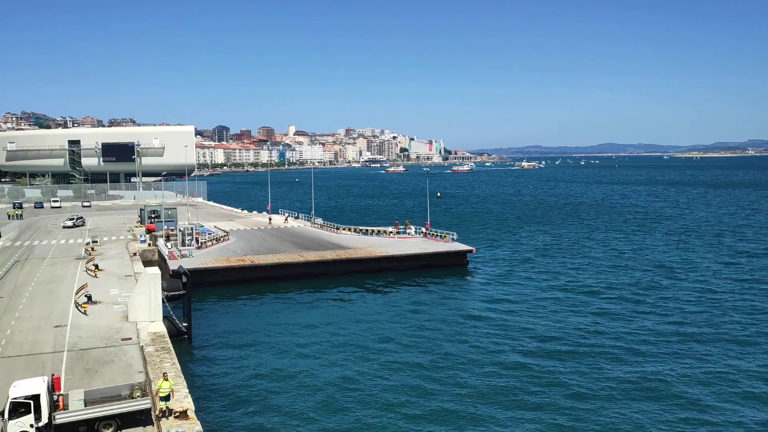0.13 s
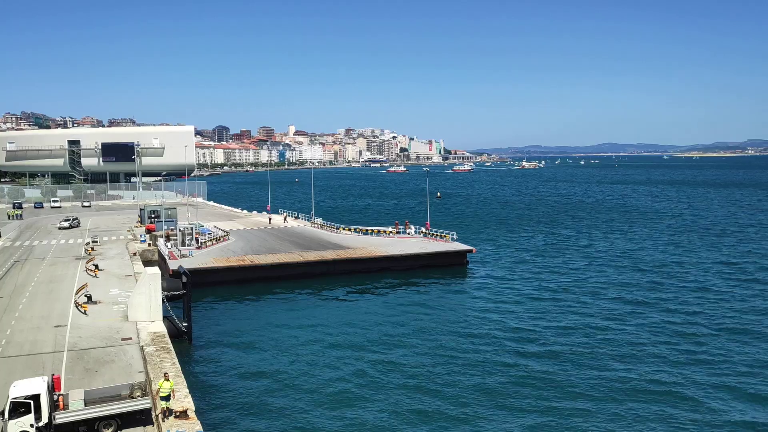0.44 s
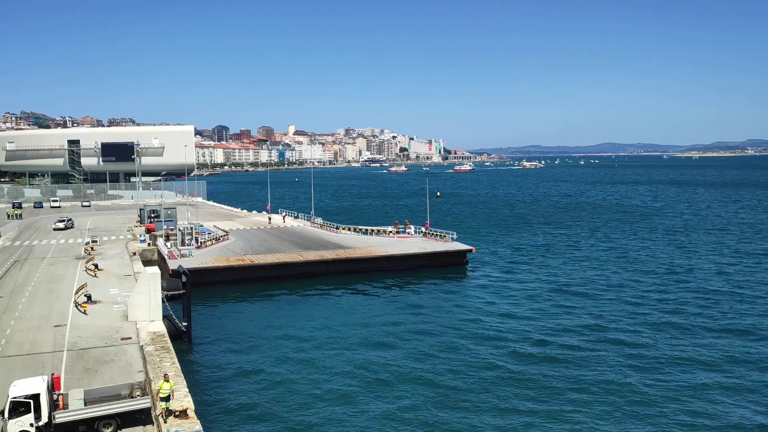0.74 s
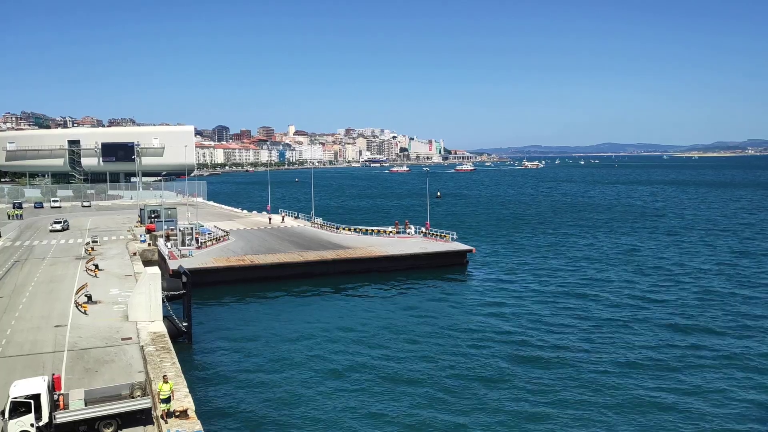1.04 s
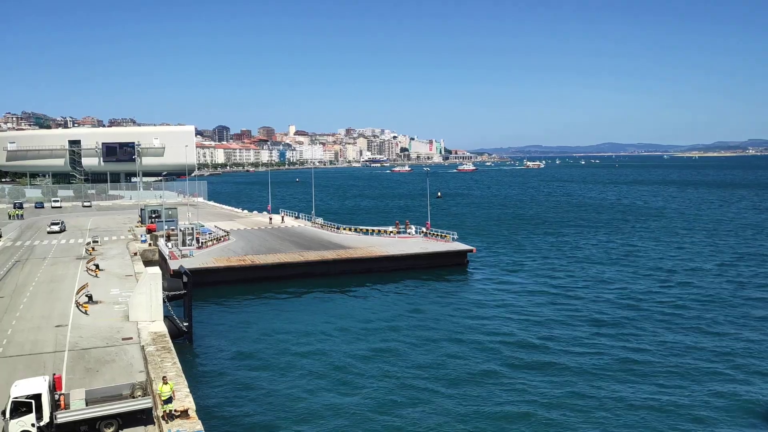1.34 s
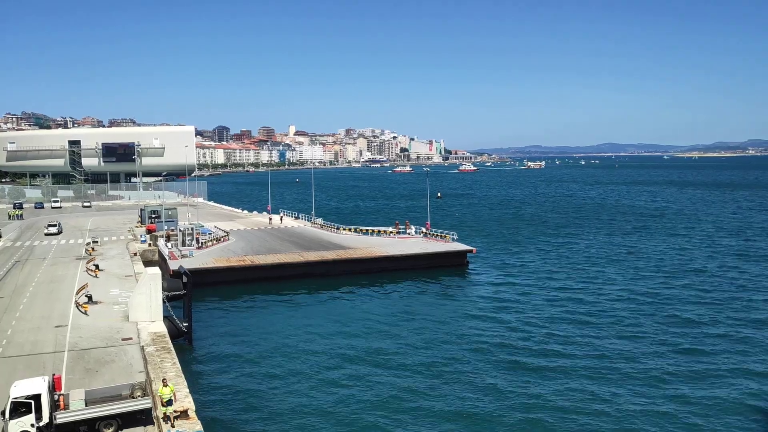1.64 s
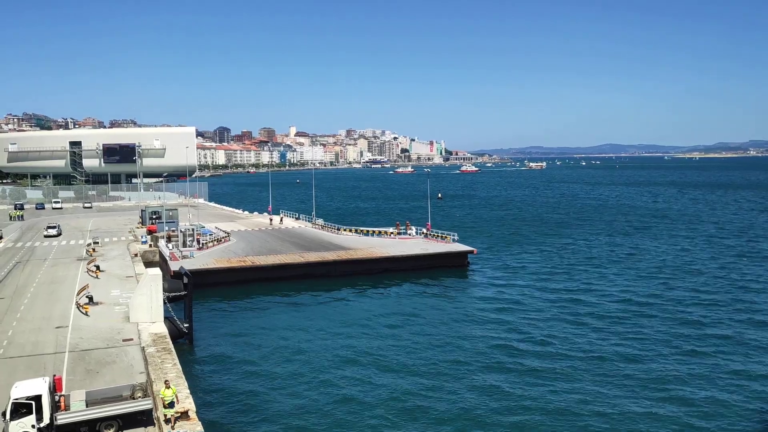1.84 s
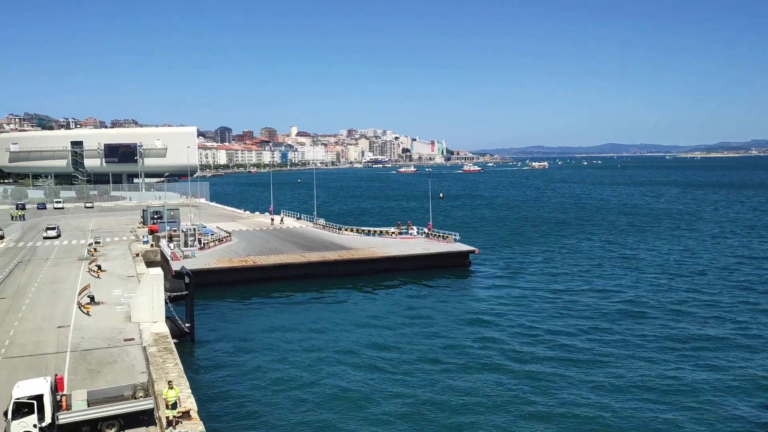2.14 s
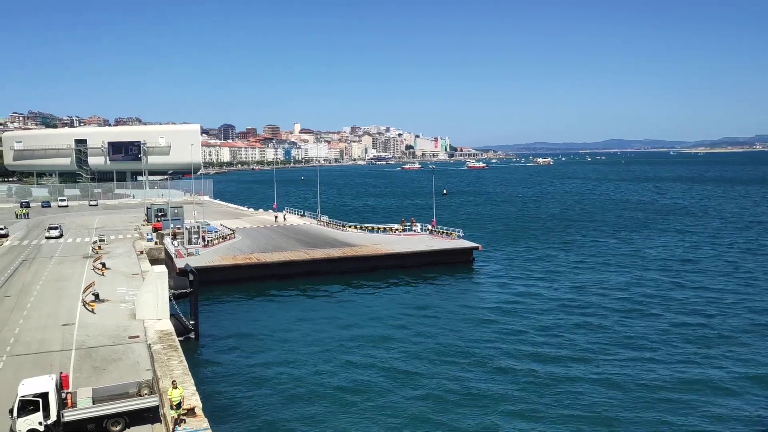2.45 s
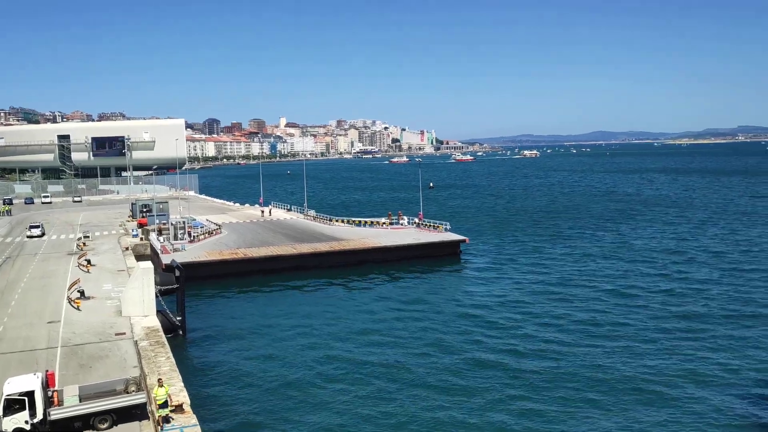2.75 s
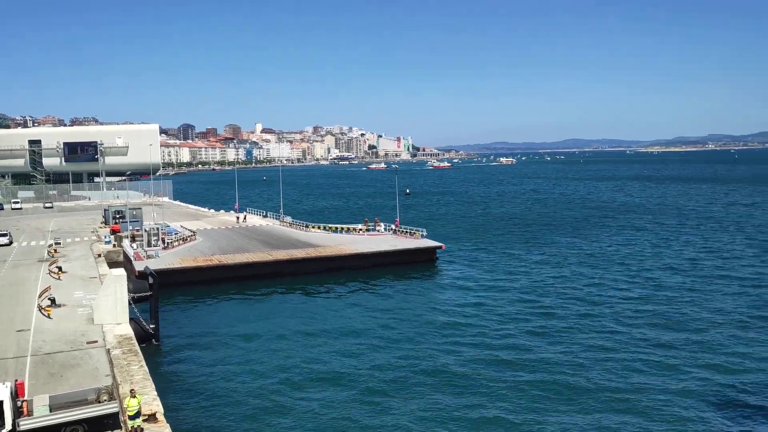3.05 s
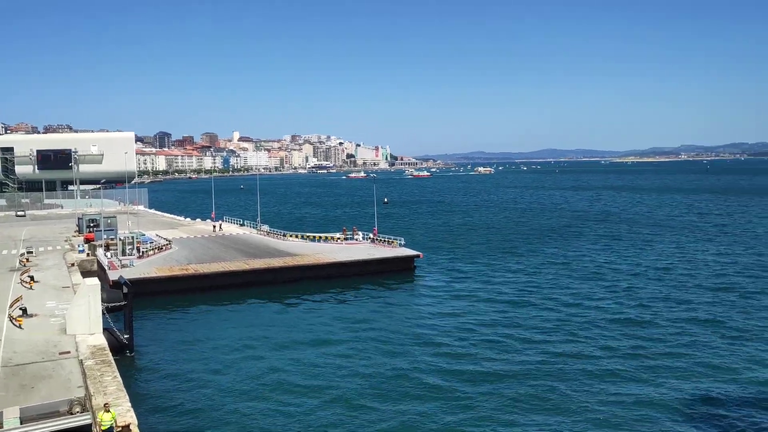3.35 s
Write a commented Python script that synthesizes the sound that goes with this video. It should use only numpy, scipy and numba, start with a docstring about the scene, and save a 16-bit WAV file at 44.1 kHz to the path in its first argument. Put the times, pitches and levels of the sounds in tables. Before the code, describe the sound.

A ship's engine whine holds one steady pitch over a dull roar of engine and fans, with faint water hiss. On an open deck above a harbour, wind thumps the unprotected stereo microphone, mostly on the right.

```python
"""On the open deck of a docking ship: a steady machine whine, a stack of phase-locked sines, over the roar of
engine and fans and the hiss of churned water, both shaped stereo noise. Wind buffets the two microphone ports
separately (noise below the roar) and pops sharply (short damped swings), mostly on the right; each channel's
limiter ducks after the big pops. The recorder fades in."""
import sys
import numpy as np
from scipy import signal
from scipy.fft import rfft, irfft, next_fast_len
from scipy.io import wavfile
from scipy.ndimage import uniform_filter1d, minimum_filter1d, map_coordinates
from numba import njit

SR = 44100
rng = np.random.default_rng(int(sys.argv[2]) if len(sys.argv) > 2 else 0)


def gain_from_db(level_db):
    """Convert decibel levels to linear amplitude factors (20 dB per decade)."""
    decades = np.asarray(level_db, float) / 20
    return 10 ** decades


def transcribe(signal):
    """Save signal, clipped to [-1, 1], as a 16-bit WAV file at the path in sys.argv[1]."""
    frames = np.atleast_2d(signal).T
    limited = np.clip(frames, -1, 1)
    pcm = np.round(limited * 32767).astype(np.int16)
    wavfile.write(sys.argv[1], SR, pcm)


N = 153909


def unit(x):
    """Scale to rms 1."""
    return x / np.sqrt(np.mean(x ** 2) + 1e-20)


def along(points, hz):
    """Interpolate (frequency [Hz], value) points on a log frequency axis."""
    f, v = np.transpose(points)
    return np.interp(np.log(hz + 1), np.log(f + 1), v)


def curves(rows):
    """One value per sample for each column after the time."""
    s, *cols = np.transpose(rows)
    return [np.interp(np.arange(N) / SR, s, c) for c in cols]


def wobble(knots_per_s):
    """Smooth random curve: a spline through normal random knots."""
    knots = rng.standard_normal(200)
    return map_coordinates(knots, [np.arange(N) * knots_per_s / SR], mode="mirror")


def filtered(x, response):
    """Multiply the spectrum of x by a function of frequency [Hz]."""
    m = next_fast_len(N + SR // 2)
    return irfft(rfft(x, m) * response(np.fft.rfftfreq(m, 1 / SR)), m)[..., :N]


def rush(left, right, alike, patchy_db):
    """Turbulent stereo noise, rms 1: random gain patches in time-frequency, then a spectrum per side."""
    z = signal.stft(rng.standard_normal((2, N)), nperseg=512)[2]
    field = uniform_filter1d(rng.standard_normal(z.shape), size=6, axis=1)
    field = uniform_filter1d(field, size=10, axis=2)
    pair = signal.istft(z * gain_from_db(patchy_db * unit(field)), nperseg=512)[1][:, :N]

    def mid_side_gain(hz):
        turn_rad = np.arccos(np.clip(along(alike, hz), -1, 1)) / 2
        return np.array([np.cos(turn_rad), np.sin(turn_rad)])

    mid, side = filtered(pair, mid_side_gain)
    ports = np.array([mid + side, mid - side])
    return unit(filtered(ports, lambda hz: gain_from_db([along(left, hz), along(right, hz)])))


WHINE_HZ, WAVER_RAD = 273.83, 0.043
FADING_DB, FADING_PER_OCTAVE_DB = 0.5, 0.67
# Strong overtones, before fading:
# (overtone, mid-time level [dB rms], left-right [dB], left lead [rad], swell [dB/s])
OVERTONES = [(1, -33, 1.5, 0.16, 0.3), (2, -27, 1.5, 1.05, 0.2), (3, -44, 4, 1.3, 0),
             (4, -43, -4.5, 1.61, -0.8), (5, -47, -3, 1.03, 0.5), (6, -43.5, 1, 1.94, 2.2),
             (7, -52.5, -7, .1, 0.6), (8, -55, -2, 1.2, 1.5), (9, -51, -0.5, 2.18, 1),
             (10, -55, 1, 1.9, 2.5), (11, -71, .1, 1.5, 3), (12, -74, .1, 1.7, .1), (13, -70, -2, 1.8, -4),
             (14, -67, 7, 1.5, 1.5)]
# Weak overtones 15 to 46, before scatter and fading: (frequency [Hz], level [dB rms], left-right [dB])
WEAK_OVERTONES = [(4000, -74, .5), (6500, -78, -5), (8000, -76, 3), (9500, -74, 6), (11500, -78, 14),
                  (13000, -84, 16)]
WEAK_SCATTER_DB = 2


def whine():
    """Locked overtones; each reaches the two ports with its own level, lead and slow fading."""
    waver = WAVER_RAD * (wobble(3.04) + wobble(9.27) / 2)
    phase = 2 * np.pi * WHINE_HZ * np.arange(N) / SR + waver
    hz, weak_db, weak_pan_db = np.transpose(WEAK_OVERTONES)
    weak = []
    for k in range(15, 47):
        db = np.interp(k * WHINE_HZ, hz, weak_db) + WEAK_SCATTER_DB * rng.standard_normal()
        weak.append((k, db, np.interp(k * WHINE_HZ, hz, weak_pan_db), 1.5, 0))
    out = np.zeros((2, N))
    for k, db, pan_db, lead_rad, swell_db_per_s in OVERTONES + weak:
        depth_db = FADING_DB + FADING_PER_OCTAVE_DB * np.log2(k)
        trend_db = swell_db_per_s * (np.arange(N) - N / 2) / SR
        start_rad = rng.uniform(0, 2 * np.pi)
        shared, own = wobble(1.44), wobble(5.17)
        for port, side in enumerate((.5, -.5)):
            own = own[::-1]  # reversed in time: a different course at each port
            fading_db = depth_db * (0.56 * shared + 0.81 * own)
            level = gain_from_db(db + trend_db + side * pan_db + fading_db)
            drift_rad = 0.031 * depth_db * np.roll(own, SR)
            angle = round(k) * phase + start_rad + side * lead_rad + drift_rad
            out[port] += np.sqrt(2) * level * np.sin(angle)
    return out


ROAR_DB = -32.5
# Roar spectrum: (frequency [Hz], relative density [dB per Hz])
ROAR_SPECTRUM = [(60, -69), (150, -2.5), (250, -5), (350, -6.5), (560, -10.5), (660, -12), (950, -13.5),
                 (1200, -14.5), (1500, -17), (1750, -16), (2100, -17), (2300, -18), (2700, -20),
                 (2950, -28), (4500, -47), (9000, -68), (15000, -120)]
# Roar at the two ports: (frequency [Hz], left-right correlation [1])
ROAR_CORRELATION = [(200, 1), (740, 0.98), (1200, -0.04), (3000, -0.1)]


def roar():
    """Broad engine and fan noise with a slight level waver."""
    level = gain_from_db(ROAR_DB + 0.35 * wobble(3.82))
    return level * rush(ROAR_SPECTRUM, ROAR_SPECTRUM, ROAR_CORRELATION, patchy_db=1.24)


WASH_GAIN_DB = 0.5
# Wash level, before WASH_GAIN_DB and waver: (time [s], level [dB])
WASH_LEVEL = [(0.4, -44.5), (0.81, -45), (1.54, -44.5), (1.82, -43.5), (2.74, -42), (2.92, -43),
              (3.49, -41.5)]
# Wash spectrum per port: (frequency [Hz], relative density [dB per Hz])
WASH_LEFT_SPECTRUM = [(800, -32), (2500, -0.5), (3800, 0), (5200, -2.5), (7000, -7), (7800, -2), (8800, -2),
                      (12800, -3), (13800, -6), (14800, -3), (15700, -11)]
WASH_RIGHT_SPECTRUM = [(800, -27), (2500, -4.5), (3800, 3.5), (5400, 2), (6200, 4.5), (7200, 4), (7900, -5),
                       (8400, 0), (9400, -3.5), (10500, -14), (12000, -21), (14900, -27), (15700, -35)]


def wash():
    """Hiss of churned water, uncorrelated and coloured differently at each port."""
    level_db, = curves(WASH_LEVEL)
    level = gain_from_db(WASH_GAIN_DB + level_db + 0.17 * wobble(7.46))
    return level * rush(WASH_LEFT_SPECTRUM, WASH_RIGHT_SPECTRUM, [(1000, 0)], patchy_db=1.04)


# Wind strength, scaling buffets and small eddies: (time [s], strength [dB], left-right [dB])
WIND_STRENGTH = [(0.1, -32, -2), (0.31, -32.5, 3), (0.43, -16, -4.5), (0.51, -22.5, 1), (0.9, -22.5, 2.5),
                 (0.92, -28, 0), (1.53, -20.5, -1.5), (1.7, -26.5, 4), (2.18, -25, 3), (2.94, -25, -2),
                 (2.97, -31.5, 1), (3.05, -18, -5), (3.09, -32, 2), (3.49, -29, 4)]


def wind():
    """Turbulence at the ports: buffets and small eddies follow the strength; heaving and big pops do not."""
    strength_db, pan_db = curves(WIND_STRENGTH)
    strength = gain_from_db(strength_db + np.array([pan_db, -pan_db]) / 2)
    return strength * (buffeting() + small_eddies()) + heaving() + big_pops()


BUFFET_DB, LUMPS_DB = 4.5, 2  # gain over wind strength; scale of the fast level lumps
# Buffet spectrum per port: (frequency [Hz], relative density [dB per Hz])
BUFFET_LEFT_SPECTRUM = [(15, -23), (45, -9), (70, -0.5), (130, -9), (250, -16.5), (500, -32.5), (1500, -71),
                        (5000, -120)]
BUFFET_RIGHT_SPECTRUM = [(15, -18), (45, 2), (70, -2), (130, -4), (250, -12.5), (500, -22), (1500, -57),
                         (5000, -120)]


def buffeting():
    """Low turbulent noise, lumpy in level independently at each port."""
    lumps = gain_from_db(LUMPS_DB * np.array([wobble(21.84), wobble(22.16)]))
    noise = rush(BUFFET_LEFT_SPECTRUM, BUFFET_RIGHT_SPECTRUM, [(30, 0.4)], patchy_db=0.0)
    return gain_from_db(BUFFET_DB) * unit(lumps * noise)


EDDY_DB, EDDY_SPREAD_DB, EDDY_HZ = -9.5, 5.5, 170  # floor over wind strength; spread; middle sharpness
# Mean eddy rate: (left [1/s], right [1/s])
EDDY_RATES = [63, 60]


def small_eddies():
    """Many small pops, random in time, port, strength and sharpness."""
    per_s = sum(EDDY_RATES)
    draw = rng.random((round(per_s * N / SR), 4))
    s = draw[:, 0] * N / SR
    port = draw[:, 1] > EDDY_RATES[0] / per_s
    db = EDDY_DB - EDDY_SPREAD_DB * np.log(1 - .99 * draw[:, 2])
    hz = EDDY_HZ * 3 ** (draw[:, 3] - .5)
    return pops(np.c_[s, port, db, hz])


POP_GAIN_DB = 1.2
# Big pops: (time [s], port [0 left, 1 right], strength before POP_GAIN_DB [dB], sharpness [Hz])
BIG_POPS = [(0.3332, 1, -6.5, 350), (0.4155, 1, -11.5, 120), (0.4207, 1, -18, 243.0),
            (0.4316, 1, -3.5, 162), (0.4346, 1, -18, 212), (0.4384, 1, -2, 357), (0.4408, 1, -0.5, 784),
            (0.448, 1, -5, 285.0), (0.4512, 1, 0, 316), (0.4556, 1, 5, 550), (0.4655, 1, -4, 310),
            (0.4742, 1, 2.5, 515), (0.487, 1, -15, 450), (0.5041, 1, -2, 386), (0.523, 1, -8, 400),
            (0.5389, 1, -10, 397), (0.6351, 1, -12, 184), (1.022, 1, -4.5, 553), (1.2455, 1, -8, 304),
            (1.3398, 1, 3.3, 676), (1.3474, 1, -1, 332), (1.372, 1, -0.5, 463), (1.4711, 0, -8, 300),
            (1.4816, 1, -1, 297), (1.4862, 1, -12, 445), (1.4904, 1, 2.5, 370), (1.542, 0, -4.5, 372),
            (1.5483, 0, -26, 556), (1.5506, 1, 1, 421.0), (1.5555, 1, 4.5, 534), (1.5899, 1, -2.5, 226),
            (2.1457, 1, -9, 207), (2.4523, 1, -14, 243), (2.8611, 1, -9, 343.0), (2.8657, 1, -13, 218),
            (2.9, 1, -22, 327.0), (3.0314, 1, -11, 175), (3.0466, 1, -19, 250), (3.0507, 1, -9, 281.0),
            (3.056, 1, -8, 229), (3.0613, 1, -2, 361.0), (3.0803, 1, -9, 684)]


def big_pops():
    """Sharp single pops from strong eddies."""
    return gain_from_db(POP_GAIN_DB) * pops(BIG_POPS)


POP_SWING, POP_LEAN_RAD = 1.16, 0.53  # swings per cycle of sharpness; phase at the centre
POP_BUILD_CYCLES, POP_SETTLE_CYCLES = 0.22, 0.36


def pops(rows):
    """Each eddy sucks the membrane out and lets it swing back past rest: a rounded dip between two small humps."""
    s, port, db, hz = np.transpose(rows)[:, :, None]
    k = np.arange(-600, 900)
    cycles = k / SR * hz
    width = np.where(cycles < 0, POP_BUILD_CYCLES, POP_SETTLE_CYCLES)
    swing = np.cos(2 * np.pi * POP_SWING * cycles + POP_LEAN_RAD)
    shape = -np.exp(-(cycles / width) ** 2) * swing
    # both ports end to end in one padded buffer
    padded = N + 1500
    at = np.round(s * SR).astype(int) + k + 600 + padded * (port > .5)
    total = np.bincount(at.ravel(), (gain_from_db(db) * shape).ravel(), 2 * padded)
    return total.reshape(2, -1)[:, 600:N + 600]


HEAVE_PAN_DB = 3  # left-right
# Heave spectrum: (frequency [Hz], relative density [dB per Hz])
HEAVE_SPECTRUM = [(2, -16), (10, 11.5), (30, 14.5), (50, 1), (75, -13), (130, -42), (250, -120)]
# Heave level, before panning: (time [s], level [dB])
HEAVE_LEVEL = [(.1, -55), (.31, -34), (.36, -22), (.9, -18.5), (1.5, -19.5), (1.62, -29), (2.3, -26.5),
               (3.05, -23.5), (3.15, -26), (3.49, -27.5)]


def heaving():
    """Slow pressure swings, mostly 10 to 50 Hz and nearly uncorrelated between the ports."""
    level_db, = curves(HEAVE_LEVEL)
    level = gain_from_db(level_db + HEAVE_PAN_DB * np.array([[.5], [-.5]]))
    return level * rush(HEAVE_SPECTRUM, HEAVE_SPECTRUM, [(30, 0.098)], patchy_db=1.1)


def scene():
    """Sum of all sources at the two ports."""
    return whine() + roar() + wash() + wind()


@njit
def recover(need, step):
    """Limiter gain: falls at once, climbs back with one time constant."""
    out = need.copy()
    for c in range(out.shape[0]):
        for i in range(1, out.shape[1]):
            out[c, i] = min(need[c, i], out[c, i - 1] + step * (1 - out[c, i - 1]))
    return out


def low_pass(x):
    """Removes everything above the highest recorded frequency."""
    return signal.sosfilt(signal.butter(12, 15730, fs=SR, output="sos"), x)


def record(dry):
    """Look-ahead limiter per channel, fade-in and band limit."""
    ceiling, release_s, ahead_s = 0.75, 0.065, .0015
    start_s, fade_s, fade_power = 0.075, 0.23, 0.66
    top_hz = 15800
    ahead = round(ahead_s * SR)
    need = np.minimum(1, ceiling / (abs(dry) + 1e-9))
    need = minimum_filter1d(need, 2 * ahead + 1, axis=1)
    gain = uniform_filter1d(recover(need, 1 / (release_s * SR)), ahead, axis=1)
    fade = np.clip((np.arange(N) / SR - start_s) / fade_s, 0, 1) ** fade_power
    mix = filtered(dry * gain * fade, lambda hz: hz < top_hz)
    return low_pass(mix)


dry = scene()
out = record(dry)
transcribe(out)
```